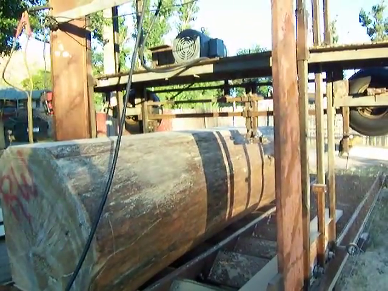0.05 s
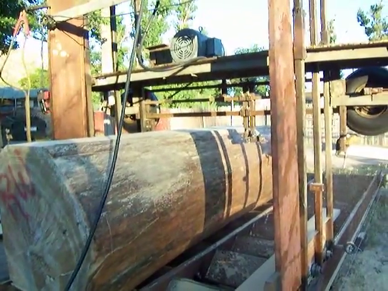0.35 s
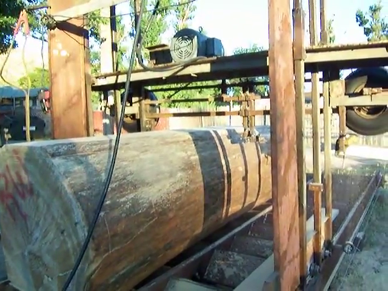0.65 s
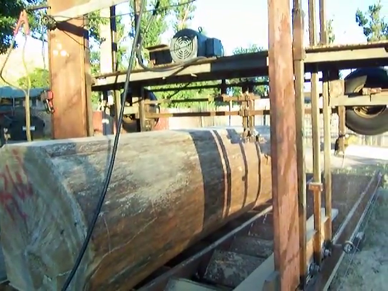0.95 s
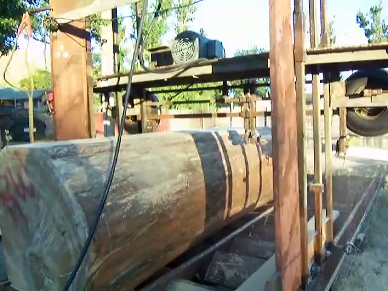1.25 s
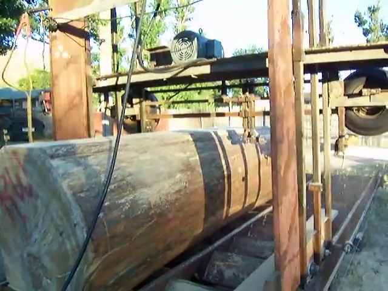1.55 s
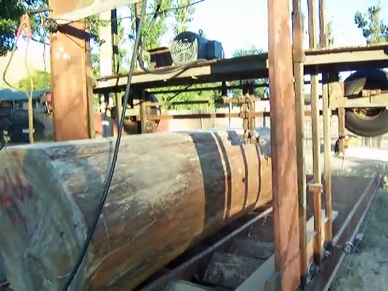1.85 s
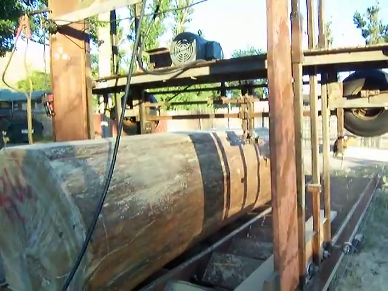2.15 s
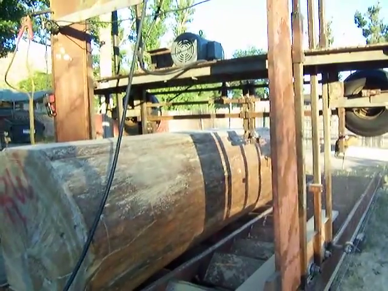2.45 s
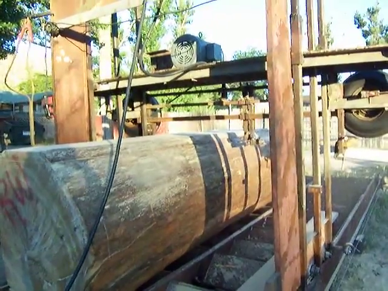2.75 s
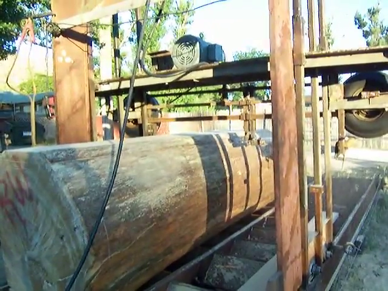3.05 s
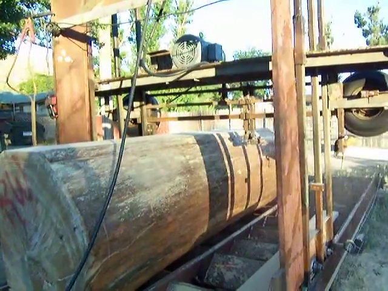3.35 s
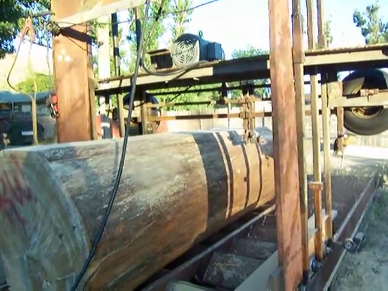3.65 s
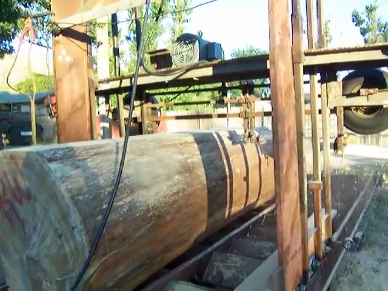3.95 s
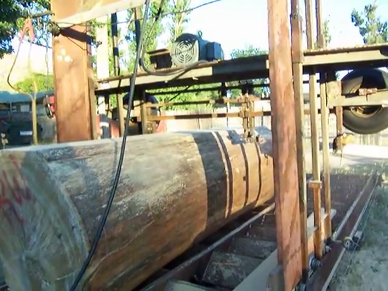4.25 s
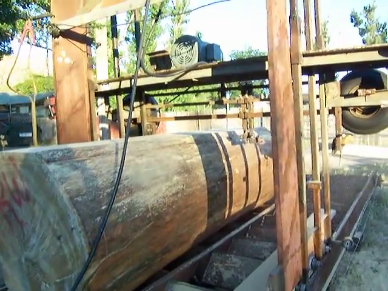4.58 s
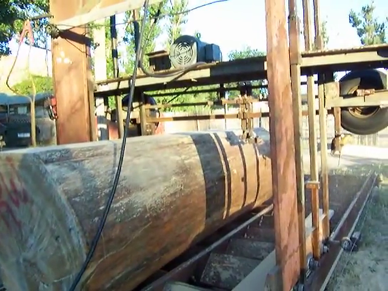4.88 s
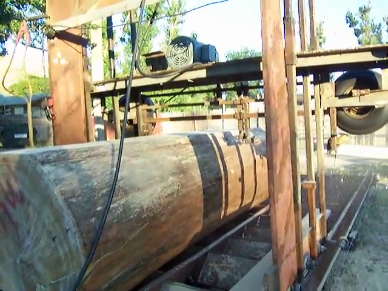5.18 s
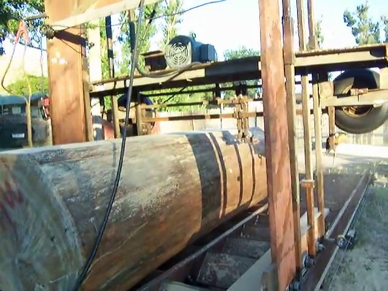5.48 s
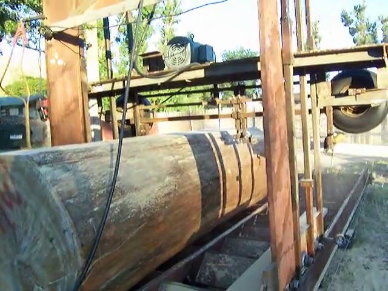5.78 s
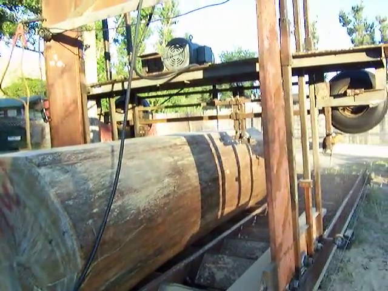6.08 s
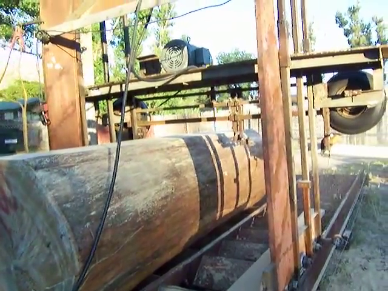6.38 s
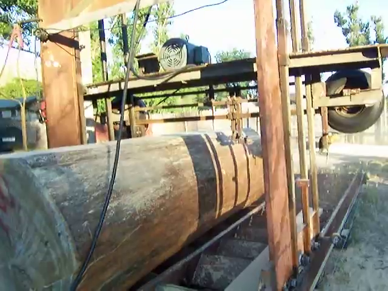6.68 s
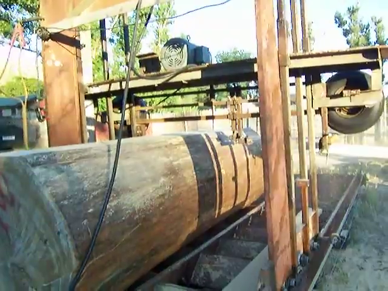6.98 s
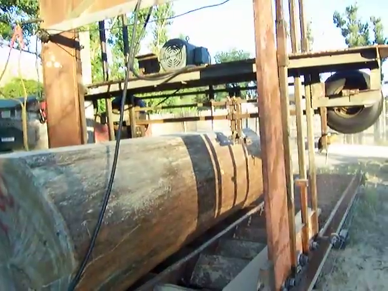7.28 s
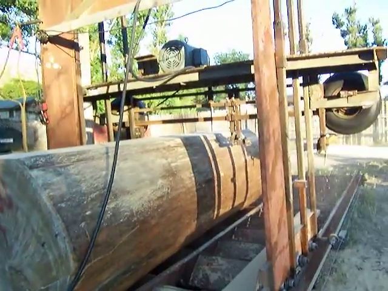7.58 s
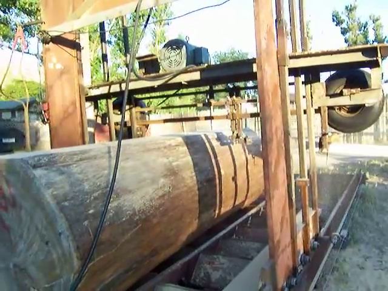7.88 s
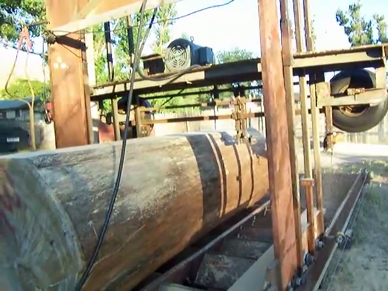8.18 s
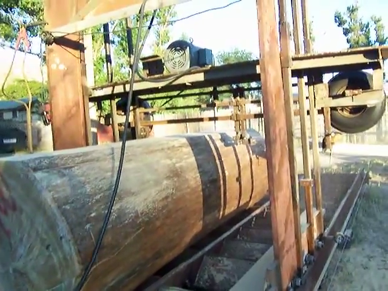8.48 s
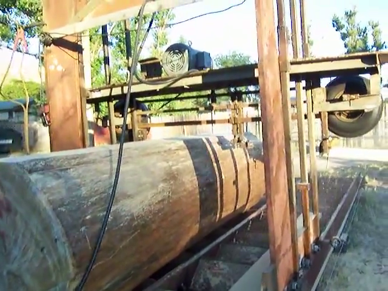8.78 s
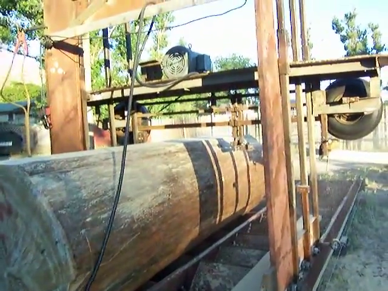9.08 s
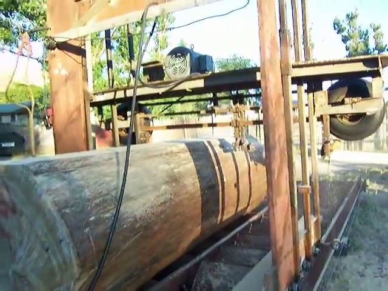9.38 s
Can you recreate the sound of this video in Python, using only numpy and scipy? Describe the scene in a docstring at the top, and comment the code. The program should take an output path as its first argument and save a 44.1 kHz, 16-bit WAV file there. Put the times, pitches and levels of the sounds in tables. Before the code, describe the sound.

A saw blade tears steadily along a large log with a harsh, high whine, above a wobbling hum and low machine rumble.

```python
"""A rasping, screaming whine near 3 kHz: an electric sawmill rips a big log lengthwise, outdoors.
Teeth tear through the wood; their passing draws a stack of overtones from the steel blade.
Below, the blade flutters in a two-note drone over shaft hum, mains hum and frame rumble.
It binds and slows for about half a second; modes catch and moan, and the log knocks now and then."""
import sys
import numpy as np
from scipy import signal
from scipy.fft import rfft, irfft, next_fast_len
from scipy.io import wavfile

SR = 44100
rng = np.random.default_rng(int(sys.argv[2]) if len(sys.argv) > 2 else 0)


def digitize_waveform(pressure):
    """Quantize a signal to 16-bit integers and store it at the path in sys.argv[1].

    Rows of a 2-D input are taken as channels; values are limited to [-1, 1].
    """
    field = np.atleast_2d(pressure).T
    bounded = np.clip(field, -1, 1)
    quanta = np.round(bounded * 32767).astype(np.int16)
    wavfile.write(sys.argv[1], SR, quanta)


N = 424683
TIME = np.arange(N) / SR
PAIRS_PER_TURN, WHINE_ORDER = 11, 16  # left-right tooth pairs; main whine's multiple of the pair rate
DEEP_MID_S, DEEP_SPAN_S = 3.9, 4.2  # transition to the deep cut


def teeth(shaft):
    """Teeth rasp, harder at each entry and once a turn; wobble and tough grain tear more fibres."""
    feed = [(0, -20.5), (.4, -20.5), (.56, -20.5), (1.05, -20.5), (1.68, -22), (2.08, -21.5), (3.5, -22),
            (4.08, -22.5), (4.35, -22), (5.95, -21.5), (6.2, -24), (6.44, -21), (7.7, -21.2), (8.17, -22.5),
            (8.36, -21), (9.61, -22)]  # feed force as rasp level: time_s, level_db
    tough_grain = [(1.95, 2.95, 0.7), (3.06, 3.68, 2.1), (5.6, 6.85, 1.4)]  # start_s, end_s, extra_db
    rasp_spectrum = [(100, -25.5), (400, -17.5), (800, -1), (1100, -9.5), (1900, -0.5), (2400, 0),
                     (2850, 5.5), (3250, 4), (3700, 6.5), (4300, 2.5), (5400, 5), (6500, 4.5), (7500, 6),
                     (8250, -9)]  # freq_hz, density_db
    tear_spectrum = [(100, -18.5), (450, -10), (720, -0.5), (1100, -5), (1650, -0.5), (2100, -2.5),
                     (3000, -3.5), (6000, -33)]  # freq_hz, density_db
    feed_db = curve(feed)
    grain_db = sum(db * gate(start, end, 0.12) for start, end, db in tough_grain)
    smoother_db = -2 * ramp(6.75, 0.65)
    tear_db = feed_db - 5 + 0.16 * wobble_db() + grain_db + smoother_db
    passing_db = 0.14 * np.cos(2 * PAIRS_PER_TURN * shaft) + 0.19 * np.cos(PAIRS_PER_TURN * shaft)
    bite = amp(0.59 * np.cos(shaft) + passing_db + 0.57 * wander(22) + 0.71 * wander(460))
    rasp = amp(feed_db - 0.62) * coloured(rasp_spectrum)
    tearing = amp(tear_db) * coloured(tear_spectrum)
    return bite * (rasp + tearing)


def whine(shaft):
    """Three overtones hit sharp blade modes and scream, swinging in pitch at each turn."""
    scream = [(0, -24), (1.45, -26), (2.3, -24.5), (3.1, -27), (3.45, -20.5), (3.8, -30), (4.3, -23),
              (5.35, -28), (5.6, -30.5), (7.35, -30.5), (8, -30.5), (8.9, -28), (9.63, -29)]  # main whine strength: time_s, level_db
    mode_hz, low_hz = 3071, 1927
    hz, deep = whine_hz(), ramp(DEEP_MID_S, DEEP_SPAN_S)
    detune_db = np.clip(0.2 * (mode_hz - hz), 0, 3)  # weaker below the mode
    unsteady = 0.749 + 0.551 * deep
    swing_hz = unsteady * (12 * np.cos(shaft + 1) + 5.55 * wander(25.5) + 5.97 * wander(5.04))
    angle = WHINE_ORDER * PAIRS_PER_TURN * shaft + phase(swing_hz)
    throb = unit(amp(0.7 * np.cos(shaft) + 0.4 * np.cos(2 * shaft) + 0.6 * np.cos(phase(6.2))))
    main = amp(curve(scream) - detune_db) * throb * sing(angle, rough=0.14 + 0.36 * deep, width_hz=64)
    octave = amp(-39.5 + 7.5 * deep) * sing(2 * angle + phase(9.1), rough=0.5, width_hz=75)
    low_angle = phase(low_hz + 0.301 * (hz - hz.mean()) + 0.5 * swing_hz)
    low = amp(-36.5 + 4 * deep) * sing(low_angle, rough=0.52, width_hz=38)
    return main + (octave + low) * amp(-6 * binding())


def blade_modes(shaft):
    """Teeth shake the steel; pinched, it sings in other modes and comes free with a new balance."""
    overtones = [(8.76, -45.5, -44.5), (10.96, -38.5, -39), (12.14, -40.5, -44.5), (13.98, -37, -42.5),
                 (15.08, -40.5, -38.5), (18.88, -40.5, -39), (21.05, -39, -40.5), (23.98, -43.5, -38),
                 (27, -38, -41), (28.07, -39, -41.5)]  # tooth passing: pair_rate_multiple, early_db, late_db
    free_modes = [(2037, 85, -42.5, -43.5), (2526, 29, -50.5, -43.5), (3474, 34, -46, -50),
                  (3790, 120, -46.5, -46.5), (4325, 74, -44, -41), (4707, 49, -39.5, -46.5),
                  (4970, 32, -41.5, -40.5), (5360, 52, -37, -49.5), (5580, 86, -46.5, -51),
                  (5730, 110, -40, -47), (6360, 100, -43.5, -64), (7810, 420, -39, -36.5)]  # freq_hz, width_hz, early_db, late_db
    bound_modes = [(1455, 45, -36.5), (1660, 41, -35.5), (2080, 38, -38), (2665, 40, -40), (2800, 30, -36),
                   (3710, 190, -38), (3950, 45, -37), (4170, 60, -40), (5030, 43, -40)]  # freq_hz, width_hz, level_db
    after, pinch = ramp(3.74, 2.7), binding()
    stack = sum(amp(early + (late - early) * after)
                * sing(phase(0) + order * PAIRS_PER_TURN * shaft, rough=0.77, width_hz=45)
                for order, early, late in overtones)
    free = sum(amp(early + (late - early) * after) * ring(hz, width)
               for hz, width, early, late in free_modes)
    bound = sum(amp(db) * ring(hz, width) for hz, width, db in bound_modes)
    throb = amp(0.33 * np.cos(shaft))
    return throb * (stack * amp(1.5) + free * amp(3.5 - 4 * pinch) + bound * pinch)


def flutter(shaft):
    """The blade wobbles in two beating notes and buzzes on the wood; a pinch damps the upper note."""
    lulls = [(.8, 0.94), (1.62, 1.86), (1.77, 1.76), (2.39, 2.47), (3.13, 3.21), (3.77, 3.92), (4.1, 4.16),
             (8.2, 8.3)]  # blade runs true: start_s, end_s
    notes_hz, buzz_hz = (279, 343), 649
    wobble = wobble_db()
    lower_db = -30.5 + wobble
    upper_db = -33.9 + 0.3 * wobble - 5.5 * binding() - 1.6 * ramp(DEEP_MID_S, DEEP_SPAN_S)
    lull_db = -9.5 * sum(gate(start, end, 0.019) for start, end in lulls)
    drift_hz = 4 * wander(11.23)
    lower, upper = (sing(phase(hz + drift_hz), rough=0.25, width_hz=36) for hz in notes_hz)
    buzz = amp((lower_db + upper_db) / 2 - 1.05) * ring(buzz_hz, width_hz=94)
    throb = unit(amp(0.99 * np.cos(shaft) + 1.4 * wander(28)))
    return amp(lull_db) * throb * (amp(lower_db) * lower + amp(upper_db) * upper + buzz)


def moans():
    """Single modes swell and fade as the kerf closes and opens on the steel."""
    caught_modes = [(1.55, 2.85, 736, -41.5), (3.48, 3.67, 303, -34.5), (3.76, 3.97, 1930, -31.5),
                    (4.75, 5.42, 2716, -38), (4.93, 5.4, 1942, -32.5), (5.72, 7.3, 303.6, -43.5),
                    (7.22, 7.46, 6150, -34), (8.75, 9.7, 4050, -37.5), (8.8, 9.362, 1932, -28.5),
                    (9.2, 9.7, 3640, -33), (9.467, 9.578, 1964, -25)]  # start_s, end_s, pitch_hz, level_db
    return sum(amp(db) * gate(start, end, 0.09) * sing(phase(hz + 4 * wander(8)), rough=0.33, width_hz=21)
               for start, end, hz, db in caught_modes)


def knocks():
    """The log knocks on its carriage: short, heavily damped booms."""
    hits = [(3.265, -27.5, 253.6, 0.059), (3.32, -36, 235, 0.057), (5.772, -32.5, 140, 0.029)]  # start_s, level_db, pitch_hz, decay_s
    attack_s = 0.0033
    out = np.zeros(N)
    for start_s, db, hz, decay_s in hits:
        age_s = np.maximum(TIME - start_s, 0)
        envelope = (1 - np.exp(-age_s / attack_s)) * np.exp(-age_s / decay_s)
        out += amp(db) * envelope * sing(phase(hz), rough=0.69, width_hz=63)
    return out


def drive(shaft):
    """Unbalanced shaft, motor mains hum and frame rumble."""
    orders = [(1, -60.5), (2, -58.5), (3, -65.5), (4, -66), (5, -57), (11, -55)]  # shaft hum: turn_rate_multiple, level_db
    rumble_spectrum = [(10, -1), (30, 0.5), (100, -3), (140, -6), (195, 1.5), (260, 4.5), (400, 0.5),
                       (1000, -26)]  # freq_hz, density_db
    hum = sum(amp(db) * np.cos(order * shaft + 2 * np.pi * rng.random()) for order, db in orders)
    mains = amp(-57.5) * np.cos(phase(hz=100))
    return np.sqrt(2) * (hum + mains) + amp(-42.5) * coloured(rumble_spectrum)


def binding():
    """1 while the kerf pinches the blade, 0 when free."""
    pinches = [(3.08, 3.39), (3.44, 3.72)]  # start_s, end_s
    return sum(gate(start, end, edge_s=0.09) for start, end in pinches)


def whine_hz():
    """Main whine pitch: follows saw speed, sags in a bind."""
    speed = [(0, 3083), (0.42, 3080), (0.57, 3063), (0.75, 3081), (1.4, 3078), (1.9, 3086), (2.6, 3086),
             (3.0, 3076), (3.8, 3095), (3.98, 3036), (4.35, 3072), (4.6, 3046), (4.8, 3080), (5.3, 3089),
             (6.1, 3068), (7.5, 3073), (8.5, 3062), (9.6, 3094)]  # free-cut speed as whine pitch: time_s, pitch_hz
    free_hz, bound_hz = curve(speed), 2974
    return free_hz + (bound_hz - free_hz) * binding()


def wobble_db():
    """Sideways blade wobble relative to a full bout; each bout rises, holds and falls to calm."""
    bouts = [(0.04, 0.146, -37.5), (0.264, 0.473, -34.5), (0.539, 0.768, -37.5), (0.915, 1.154, -38.5),
             (1.227, 1.584, -35), (1.875, 1.938, -39), (2.035, 2.202, -36), (2.574, 2.824, -38.5),
             (2.925, 3.09, -37), (3.235, 3.385, -37.5), (3.5, 3.747, -38), (3.948, 4.08, -36.5),
             (4.173, 4.315, -33.5), (4.462, 4.75, -34), (4.9, 5.117, -45), (5.4, 5.624, -40),
             (5.74, 5.928, -33), (6.23, 6.415, -36.5), (6.555, 6.967, -35.5), (7.002, 7.345, -40),
             (7.474, 7.84, -40.5), (7.91, 8.19, -35.5), (8.3, 8.692, -37.5), (8.743, 9.096, -40.5)]  # start_s, end_s, level_db
    attack_s, release_s = 0.087, 0.045
    calm_db, full_db = -44.5, -32.5
    swell = sum(amp(db) * ramp(start, attack_s) * (1 - ramp(end, release_s)) for start, end, db in bouts)
    return 20 * np.log10(np.hypot(swell, amp(calm_db))) - full_db


def sing(angle, rough, width_hz):
    """Self-excited tone: clean core plus a noise halo with power share `rough`."""
    halo = wander(width_hz) * np.cos(angle) + wander(width_hz) * np.sin(angle)
    return np.sqrt(2 * (1 - rough)) * np.cos(angle) + np.sqrt(rough) * halo


def ring(hz, width_hz):
    """Resonance shaken by random blows."""
    return noise(lambda f: 1 / (1 + ((f - hz) / (0.78 * width_hz)) ** 2))


def coloured(spectrum):
    """Noise from spectrum points joined over log frequency."""
    hz, db = np.transpose(spectrum)
    return noise(lambda f: amp(np.interp(np.log(f + 1), np.log(hz), db)))


def wander(rate_hz):
    """Random drift, rms 1."""
    return noise(lambda f: np.exp(-(f / rate_hz) ** 2))


def noise(shape):
    """Noise with magnitude shape(freq_hz), rms 1."""
    size = next_fast_len(N, real=True)
    spectrum = rfft(rng.standard_normal(size)) * shape(np.fft.rfftfreq(size, 1 / SR))
    return unit(irfft(spectrum, size)[:N])


def phase(hz):
    """Running phase in radians, random start."""
    return 2 * np.pi * (np.cumsum(hz * np.ones(N)) / SR + rng.random())


def curve(points):
    """Per-sample curve through (time_s, value) points."""
    return np.interp(TIME, *np.transpose(points))


def ramp(mid_s, span_s):
    """Linear rise from 0 to 1."""
    return np.clip((TIME - mid_s) / span_s + 0.5, 0, 1)


def gate(start_s, end_s, edge_s):
    """1 from start to end, soft edges."""
    return ramp(start_s, edge_s) - ramp(end_s, edge_s)


def amp(db):
    """Decibels to gain."""
    return 10 ** (np.asarray(db) / 20)


def unit(x):
    """Scale to rms 1."""
    return x / np.sqrt(np.mean(x ** 2) + 1e-20)


def scene():
    """Mono mix; one shaft turns the mill and slows under load."""
    shaft = phase(whine_hz() / (WHINE_ORDER * PAIRS_PER_TURN))
    cutting = teeth(shaft) + blade_modes(shaft) + whine(shaft) + moans() + flutter(shaft)
    return (cutting + drive(shaft) + knocks())[None]


def record(dry):
    """The level drops abruptly and creeps back at intervals; then a low-pass."""
    dips = [(.052, 1.5), (0.49, 1), (0.758, 3.5), (1.238, 3.5), (1.842, 1), (2.218, 0.9), (2.669, 1.5),
            (2.859, 2), (4.307, 2), (4.627, 2), (5.419, 2), (6.506, 1.5), (6.774, 2), (7.439, 2.5),
            (7.799, 3.5), (8.338, 3), (9.201, 2.5)]  # start_s, depth_db
    recovery_s, cutoff_hz = 0.48, 8700
    dip_db = sum(depth * ramp(start, 0.002) * np.clip(1 - (TIME - start) / recovery_s, 0, 1)
                 for start, depth in dips)
    lowpass = signal.firwin(201, cutoff_hz, window=("kaiser", 9), fs=SR)
    return signal.oaconvolve(dry * amp(-dip_db), lowpass[None], "same")


dry = scene()
out = record(dry)
digitize_waveform(out)
```